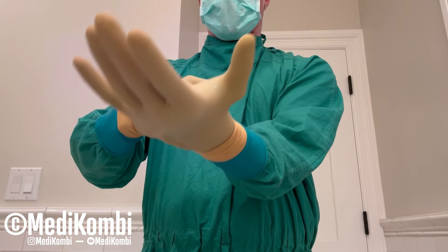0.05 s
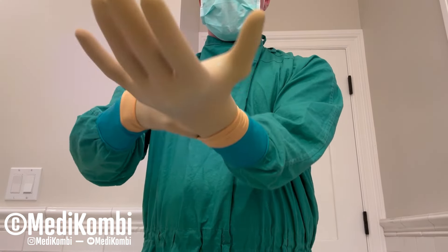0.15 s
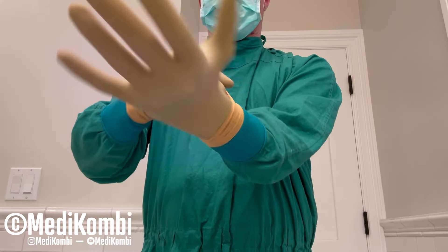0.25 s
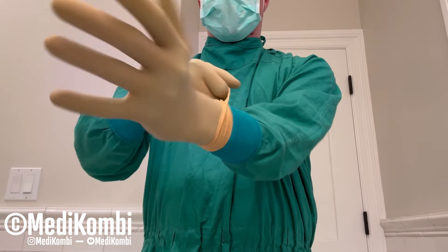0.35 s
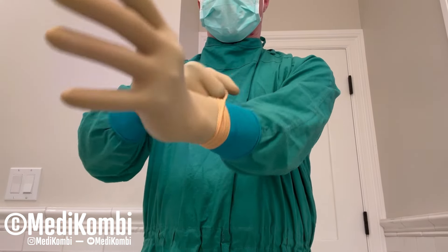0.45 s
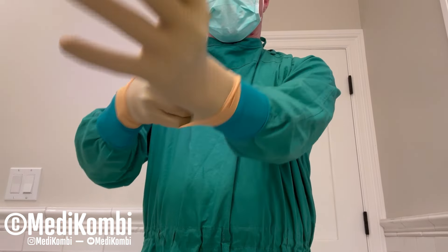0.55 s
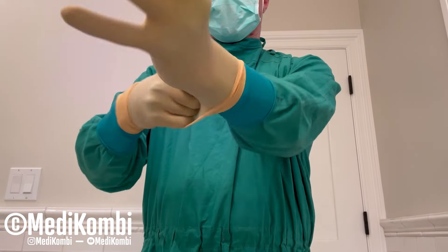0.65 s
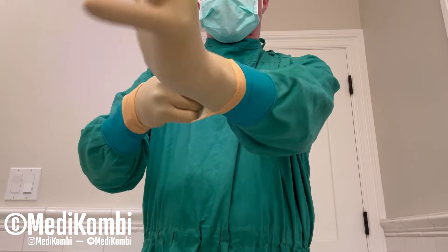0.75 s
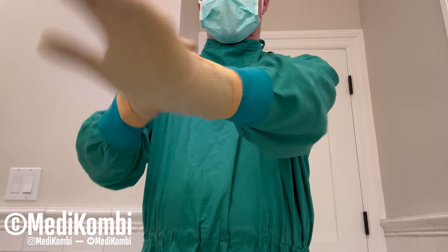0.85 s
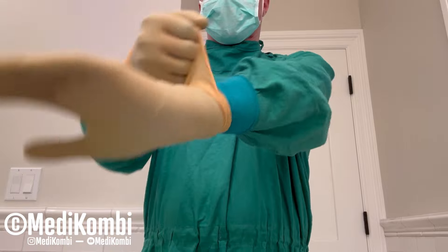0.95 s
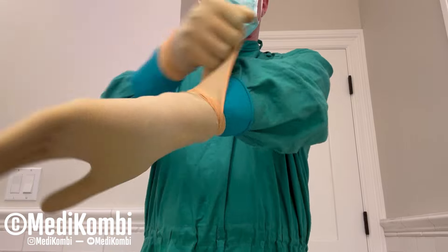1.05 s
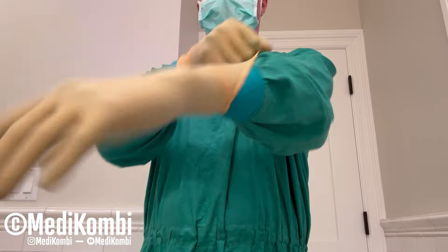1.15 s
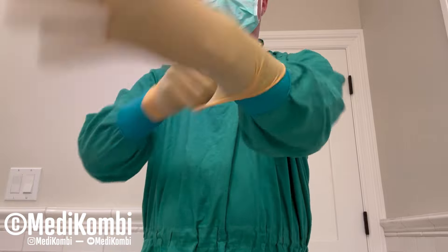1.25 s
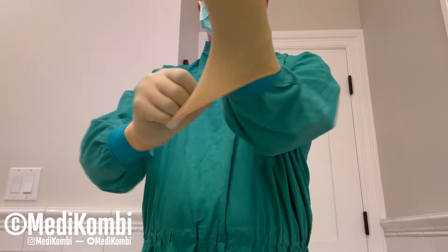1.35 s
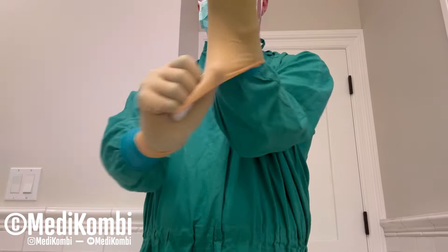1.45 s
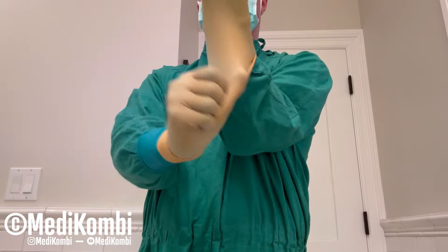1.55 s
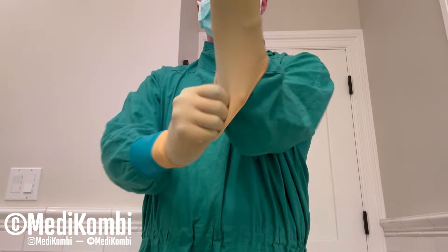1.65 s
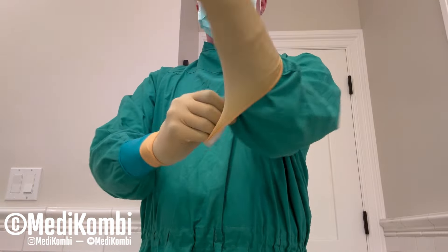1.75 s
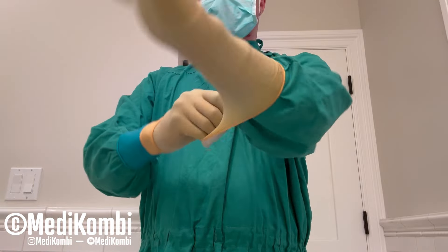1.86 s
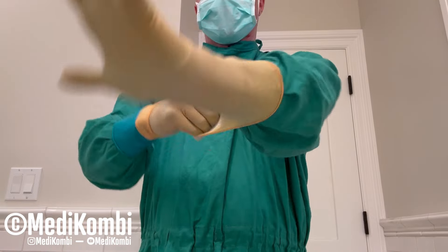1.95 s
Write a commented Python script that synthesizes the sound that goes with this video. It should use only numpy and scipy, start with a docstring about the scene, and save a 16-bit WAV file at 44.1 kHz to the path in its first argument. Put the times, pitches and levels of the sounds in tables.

```python
"""A short rubber hiss, then the stretched cuff of a rubber glove snaps onto the wrist, close to a microphone.
Rubber then drags over skin and sleeve in short strokes (dense random clicks), lets go with sharp ticks
(filtered click bursts), and its slack folds flap with soft thumps (damped rough sines).
All of it rings in a small hard-walled room, over faint steady background noise."""
import sys
import numpy as np
from scipy import signal
from scipy.fft import rfft, irfft, next_fast_len
from scipy.io import wavfile

SR = 44100
rng = np.random.default_rng(int(sys.argv[2]) if len(sys.argv) > 2 else 0)


def pcm_store(signal):
    """Save signal as 16-bit PCM."""
    levels = np.round(np.clip(np.atleast_2d(signal), -1, 1) * 32767)
    wavfile.write(sys.argv[1], SR, levels.astype(np.int16).T)


N = 88200  # samples: 2 s


def undb(db):
    """Decibels to amplitude gain."""
    return 10 ** (np.asarray(db) / 20)


def on_axis(points, hz):
    """Interpolate a (frequency, value) table over log frequency."""
    table_hz, values = np.array(points, float).T
    return np.interp(np.log(hz + 1), np.log(table_hz), values)


TILT_PIVOT_HZ = 8000


def colour(x, points, tilt_db_per_oct=0, keep_power=True):
    """Minimum-phase filter with the given spectrum and tilt; energy follows the gain, not a delay."""
    n = 2 * next_fast_len(x.shape[-1])
    hz = np.fft.rfftfreq(n, 1 / SR)
    octaves = np.log2(np.maximum(hz, TILT_PIVOT_HZ / 10) / TILT_PIVOT_HZ)
    gain = undb(on_axis(points, hz) + tilt_db_per_oct * octaves)
    if keep_power:
        gain = gain / np.sqrt(np.mean(gain ** 2))
    # fold the cepstrum onto positive time: minimum phase
    cepstrum = irfft(np.log(gain))
    cepstrum[1:n // 2] *= 2
    cepstrum[n // 2 + 1:] = 0
    response = np.exp(rfft(cepstrum))
    return irfft(rfft(x, n) * response)[..., :x.shape[-1]]


def add(out, start_s, x):
    """Mix a short sound in at its time, trimmed to the scene."""
    i = int(round(start_s * SR))
    a, b = max(i, 0), min(i + len(x), N)
    if b > a:
        out[a:b] += x[a - i:b - i]


def contact(spread_s, grit, size=2048, count=3):
    """Unit-energy click, broken by allpass stages into a ragged burst as rubber lands or lifts bit by bit."""
    x = signal.unit_impulse(size)
    g = np.clip(grit, 0, .8)
    for share in (np.arange(count) + rng.random(count)) / count:
        taps = np.r_[g, np.zeros(int(share * spread_s * SR)), 1]
        x = signal.lfilter(taps, taps[::-1], x)
    return x


def slips(per_s, spread_db, size=16384):
    """Dense tiny stick-slip clicks at random times, of random sign and uneven size, rms 1."""
    hits = rng.random(size) < per_s / SR
    signs = rng.choice([-1, 1], size)
    sizes = undb(spread_db * np.minimum(rng.exponential(size=size), 4))
    x = hits * signs * sizes
    return x / (x.std() + 1e-12)


# cuff hits the wrist: start_s, crack_rel_db, slap_rel_db
SNAP_EVENTS = [(0.1898, -22.5, -18), (0.222, -2, -1)]
# crack spectrum: freq_hz, relative_density_db
CRACK_SPECTRUM = [(300, -32.5), (1800, -22.5), (2650, -17), (3150, 0.5), (3800, -5), (4300, 3.5),
                  (5200, -2.5), (6000, -12.5), (7500, -8), (9500, -23.5), (12500, -5.5), (16000, -40)]
# slap spectrum: freq_hz, relative_density_db
SLAP_SPECTRUM = [(60, -64), (280, -37.5), (420, -8.5), (520, -20.5), (680, -4.5), (1000, 0), (1300, -2),
                 (1600, -8.5), (2300, -12), (5000, -52), (16000, -59)]
CRACK_OFFSET_DB, SLAP_OFFSET_DB, SLAP_LAG_S = 3.5, 0, 0.00058
CRACK_SPREAD_S, SLAP_SPREAD_S, SNAP_GRIT = .0004, .0006, 0.76
CRACK_ROOM_DB, SLAP_ROOM_DB, SNAP_PORT_LAG_S = 4.5, -2.5, .00002


def cuff_snaps(room):
    """The cuff slips once, then whips home: a bright crack, then a hollow slap on the skin."""
    crack, slap = np.zeros((2, N))
    for start_s, crack_rel_db, slap_rel_db in SNAP_EVENTS:
        crack_hit = colour(contact(CRACK_SPREAD_S, SNAP_GRIT), CRACK_SPECTRUM)
        slap_hit = colour(contact(SLAP_SPREAD_S, SNAP_GRIT), SLAP_SPECTRUM)
        add(crack, start_s, undb(CRACK_OFFSET_DB + crack_rel_db) * crack_hit)
        add(slap, start_s + SLAP_LAG_S, undb(SLAP_OFFSET_DB + slap_rel_db) * slap_hit)
    crack_heard = heard(crack, room, CRACK_ROOM_DB, SNAP_PORT_LAG_S)
    return crack_heard + heard(slap, room, SLAP_ROOM_DB, SNAP_PORT_LAG_S)


# sticking rubber lets go: start_s, level_db, tilt_db_per_oct
TICK_EVENTS = [(0.1635, -17.5, -1.5), (0.1898, -12, 0), (0.2234, -2.5, -2), (.528, -26, -11),
               (0.597, -26, -7), (0.7528, -37, 2), (.7835, -30, 0.5), (.824, -30, -3), (.872, -20.5, -2.5),
               (0.898, -18, -4.5), (0.9229, -17, -1), (.9875, -26, 7), (1.004, -12.5, 3),
               (1.2021, -13, 1.5), (1.2951, 0.5, 0), (1.3174, -2, -2), (1.3449, -3.5, -1),
               (1.3965, -3.5, 0.5), (1.6643, -29, -9), (1.868, -31, 3.5), (1.9023, -17, 10.5)]
# tick spectrum: freq_hz, relative_density_db
TICK_SPECTRUM = [(100, -33), (600, -17), (2000, -5.5), (4000, 0), (7000, -3.5), (9500, -0.5), (12000, 4.5),
                 (14000, 7), (16000, -7.5)]
TICK_SPREAD_S, TICK_GRIT, TICK_ROOM_DB, TICK_PORT_LAG_S = 0.00028, 0.72, -6.5, .00014


def ticks(room):
    """Thin bright clicks as stuck rubber peels free; folds scatter each one differently to the two ports."""
    out = np.zeros((2, N))
    for start_s, level_db, tilt_db_per_oct in TICK_EVENTS:
        for port in out:
            click = colour(contact(TICK_SPREAD_S, TICK_GRIT), TICK_SPECTRUM, tilt_db_per_oct)
            add(port, start_s, undb(level_db) * click)
    return heard(out, room, TICK_ROOM_DB, TICK_PORT_LAG_S)


# rubber dragged over skin and sleeve: start_s, length_s, hiss_db, hiss_tilt_db_per_oct, rustle_db
STROKE_EVENTS = [(-.03, 0.035, -38, 2, -59), (0.033, 0.28, -60.5, -2, -70), (.19, 0.073, -44, 0, -61),
                 (0.325, 0.085, -56.5, 3, -56), (0.488, 0.082, -55.5, -2, -55),
                 (0.561, 0.079, -61, 1.5, -77), (0.837, 0.047, -55.5, 0.5, -66),
                 (0.878, 0.056, -46, 1, -57.5), (0.952, 0.096, -52, -0.5, -61), (1.01, 0.13, -48, 1, -66.5),
                 (1.135, 0.095, -45.5, 0, -59), (1.237, 0.073, -50.5, 1, -54.5),
                 (1.319, 0.055, -45, 1, -53.5), (1.371, 0.037, -48, 8, -46), (1.45, 0.13, -59.5, 9, -57),
                 (1.62, 0.052, -58, 1.5, -56), (1.66, 0.093, -51, -2, -90), (1.737, 0.13, -60.5, 0, -72.5),
                 (1.916, 0.13, -60, -3.5, -85)]
# hiss spectrum: freq_hz, relative_density_db
HISS_SPECTRUM = [(200, -17), (900, -12), (2200, 5.5), (4000, 3), (5500, -4), (7500, -2), (9500, -5),
                 (12500, 10), (14000, 5.5), (16000, -28)]
# rustle spectrum: freq_hz, relative_density_db
RUSTLE_SPECTRUM = [(30, -33), (70, -11), (130, -8), (300, -0.5), (650, 1), (1200, -1.5), (2000, -13),
                   (5000, -16), (16000, -72)]
STROKE_ATTACK_S, STROKE_RELEASE_S = 0.0086, 0.015
SLIPS_PER_S, SLIP_SPREAD_DB, HISS_ROOM_DB, HISS_PORT_LAG_S = 5000, 4, -5, .00014
CREASES_PER_S, CREASE_SPREAD_DB, RUSTLE_ROOM_DB = 980, 1, -0.5


def rubbing(room, size=16384):
    """Each stroke is a hiss of fine slips over the duller rustle of moving creases."""
    hiss, rustle = np.zeros((2, N))
    t = np.arange(size) / SR
    for start_s, length_s, hiss_db, tilt_db_per_oct, rustle_db in STROKE_EVENTS:
        attack = np.minimum(t / STROKE_ATTACK_S, 1)
        drag = attack * np.exp(-np.maximum(t - length_s, 0) / STROKE_RELEASE_S)
        fine = colour(drag * slips(SLIPS_PER_S, SLIP_SPREAD_DB), HISS_SPECTRUM, tilt_db_per_oct)
        coarse = colour(drag * slips(CREASES_PER_S, CREASE_SPREAD_DB), RUSTLE_SPECTRUM)
        add(hiss, start_s, undb(hiss_db) * fine)
        add(rustle, start_s, undb(rustle_db) * coarse)
    hiss_heard = heard(hiss, room, HISS_ROOM_DB, HISS_PORT_LAG_S)
    return hiss_heard + heard(rustle, room, RUSTLE_ROOM_DB)


# slack folds flap, trapped air pops out: start_s, level_db, pitch_hz, swell_ms, scuff_db
FLAP_EVENTS = [(0.102, -47, 1080, 0.47, -72), (.499, -50, 880, 0.73, -48), (.527, -43, 446, 3.8, -60),
               (.552, -42, 730, 1.2, -48), (0.639, -51.5, 476, 2.55, -53.5), (.906, -44, 434, 2.5, -73),
               (.948, -50.5, 422, 3.7, -75), (1.013, -48.5, 620, 2.5, -48), (1.046, -51, 151, 3, -44),
               (1.12, -50.5, 523, 3.4, -43), (1.139, -37.5, 457, 2.8, -40.5),
               (1.1788, -26.5, 378, 1.57, -41), (1.2028, -30, 492, 1.75, -36),
               (1.272, -41.5, 190, 6.6, -68), (1.309, -38, 204, 1.8, -58), (1.343, -40.5, 445, 2.9, -42),
               (1.380, -41, 324, 6.2, -52), (1.401, -30.5, 323, 1.27, -37),
               (1.551, -43.5, 1080, 0.7, -42.5), (1.663, -36.5, 684, 1.02, -36.5),
               (1.700, -47, 1520, 1.3, -38.5), (1.716, -36.5, 1340, 0.23, -37),
               (1.747, -49, 1310, 0.92, -47), (1.9398, -42.5, 1400, 0.38, -52)]
# scuff spectrum: freq_hz, relative_density_db
SCUFF_SPECTRUM = [(100, -22), (600, -9.5), (1100, -4), (2000, -1.5), (3000, -30), (6000, -14), (16000, -5)]
FLAP_ROUGH_RAD, FLAP_ROUGH_HZ, FLAP_ROOM_DB, FLAP_HIGHPASS_HZ = .25, 245, -4, 130


def flaps(room, size=4096):
    """A loose fold swings for a few rough, heavily damped cycles and scuffs its neighbour."""
    out, t = np.zeros(N), np.arange(size) / SR
    rough_lowpass = signal.butter(2, FLAP_ROUGH_HZ, fs=SR, output="sos")
    for start_s, level_db, pitch_hz, swell_ms, scuff_db in FLAP_EVENTS:
        age = t / (swell_ms / 1000)
        envelope = age * np.exp(1 - age)  # peaks at 1 after swell_ms
        rough = signal.sosfilt(rough_lowpass, rng.standard_normal(size))
        swing = np.sin(2 * np.pi * pitch_hz * t + FLAP_ROUGH_RAD * rough / rough.std())
        scuff = colour(rng.standard_normal(size), SCUFF_SPECTRUM)
        add(out, start_s, envelope * (undb(level_db) * swing + undb(scuff_db) * scuff))
    highpass = signal.butter(2, FLAP_HIGHPASS_HZ, "high", fs=SR, output="sos")
    return heard(signal.sosfilt(highpass, out), room, FLAP_ROOM_DB)


PORT_LAG_S = 0.000092  # left behind right


def heard(x, room, room_db, lag_s=PORT_LAG_S):
    """The direct sound reaches the right port a moment before the left; the room is added."""
    x = np.broadcast_to(x, (2, N))
    lag = np.exp(-2j * np.pi * np.fft.rfftfreq(2 * N, 1 / SR) * lag_s)
    left = irfft(rfft(x[0], 2 * N) * lag)[:N]
    direct = np.array([left, x[1]])
    return direct + undb(room_db) * signal.fftconvolve(x, room, axes=1)[:, :N]


# decay of the room: freq_hz, t60_s
ROOM_DECAY = [(150, 0.3), (400, 0.54), (1000, 0.46), (2200, 0.41), (4400, .47), (8000, 0.42), (13000, 0.26)]
ROOM_GAP_S, ROOM_BUILD_S, ROOM_ALIKE_HZ = .003, .004, 176
WALL_DELAY_S, WALL_DB = .004, -12  # one echo, right port only


def room_response():
    """Diffuse echoes, alike left and right only in the bass, each band dying at its own rate."""
    t = np.arange(N // 2) / SR
    hz = np.fft.rfftfreq(len(t), 1 / SR)
    mid, side = rfft(rng.standard_normal((2, len(t))))
    alike = 1 / (1 + (hz / ROOM_ALIKE_HZ) ** 2)
    noise = mid * np.sqrt(1 + alike) + np.array([side, -side]) * np.sqrt(1 - alike)
    tail = 0
    for band_hz, t60_s in ROOM_DECAY:
        share = on_axis([(f, f == band_hz) for f, _ in ROOM_DECAY], hz)
        decay = np.exp(-np.log(1000) * t / t60_s)
        tail = tail + irfft(noise * share, len(t)) * decay
    tail = tail * np.clip((t - ROOM_GAP_S) / ROOM_BUILD_S, 0, 1)
    tail /= np.sqrt(np.sum(tail ** 2, axis=1, keepdims=True))
    tail[1, int(WALL_DELAY_S * SR)] += undb(WALL_DB)
    return tail


# background spectrum: freq_hz, relative_density_db
AIR_SPECTRUM = [(15, -18), (25, -5), (114, 1), (384, -29.5), (1330, -8), (7920, -12), (9320, 8),
                (10700, -8), (11900, -6.5), (13600, -20), (16000, -27)]
AIR_MID_DB, AIR_SIDE_RATIO = -63, 0.68


def air():
    """Faint steady background of the room: coloured noise, partly shared by the two ports."""
    mid, side = colour(rng.standard_normal((2, N)), AIR_SPECTRUM)
    return undb(AIR_MID_DB) * (mid + AIR_SIDE_RATIO * np.array([side, -side]))


PAN_LEFT_RE_RIGHT_DB = -1.4


def scene():
    """All the glove's sounds in one room, a little to the right, over the background."""
    room = room_response()
    glove = cuff_snaps(room) + ticks(room) + rubbing(room) + flaps(room)
    pan = undb(np.array([[PAN_LEFT_RE_RIGHT_DB], [-PAN_LEFT_RE_RIGHT_DB]]) / 2)
    return glove * pan + air()


# colour of the microphone: freq_hz, gain_db
MIC_RESPONSE = [(1000, -2), (8000, 0), (9000, -12), (9700, -22), (10700, -1), (13500, -9), (14700, -6),
                (15600, -18)]
TOP_HZ = 16500


def record(dry):
    """The microphone colours the treble; a steep lowpass cuts the top."""
    coloured = colour(dry, MIC_RESPONSE, keep_power=False)
    return signal.sosfilt(signal.ellip(8, .2, 70, TOP_HZ, fs=SR, output="sos"), coloured)


dry = scene()
out = record(dry)
pcm_store(out)
```